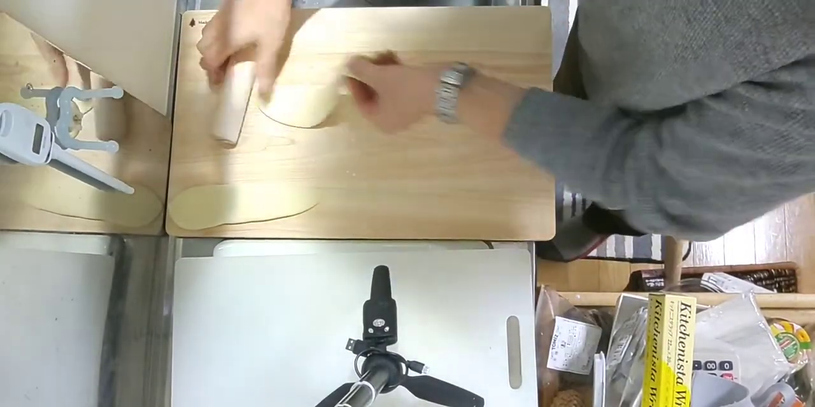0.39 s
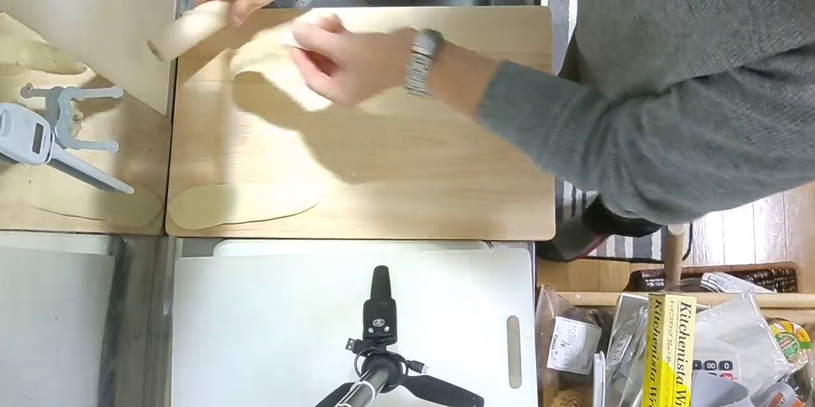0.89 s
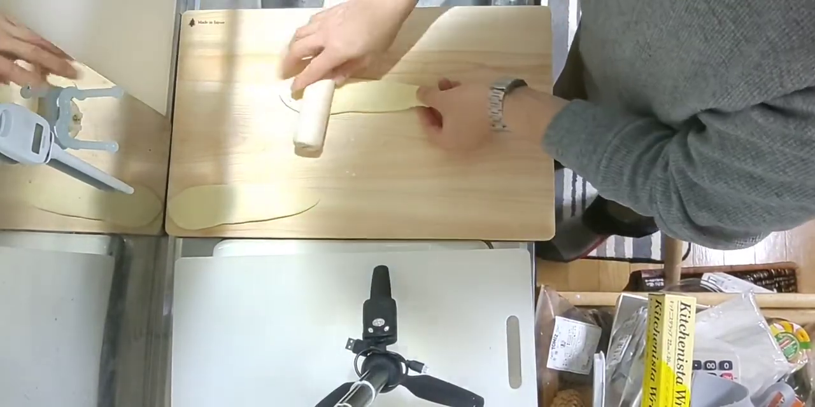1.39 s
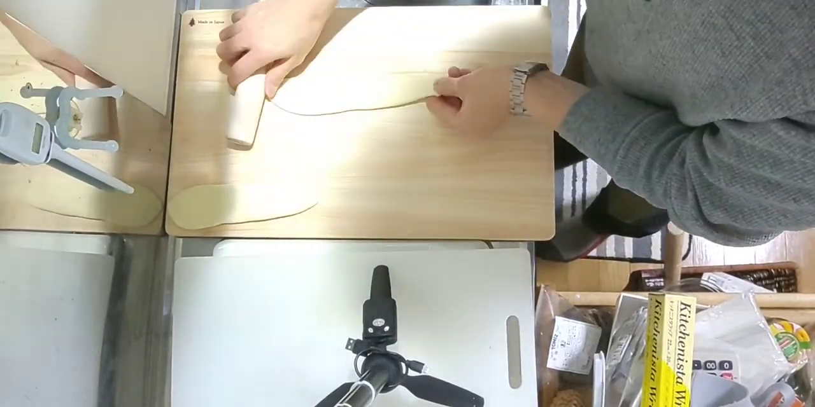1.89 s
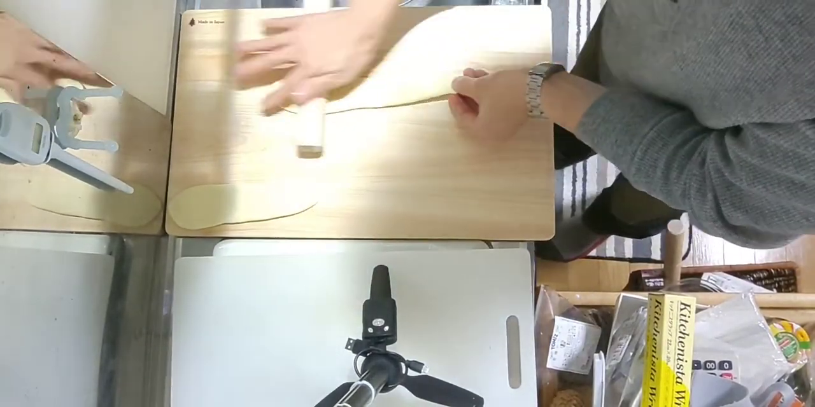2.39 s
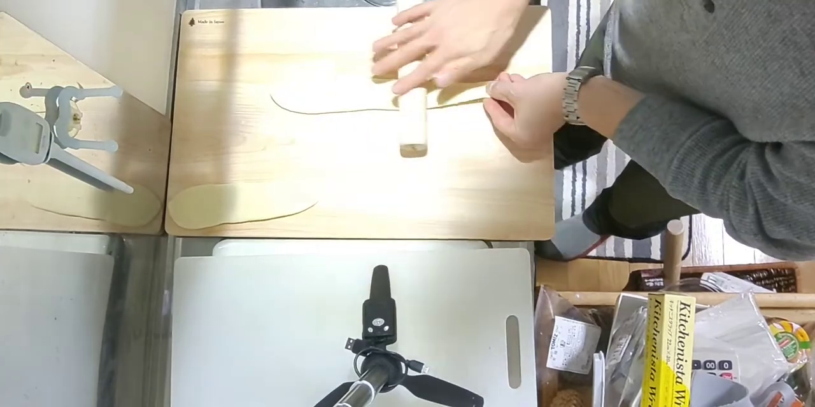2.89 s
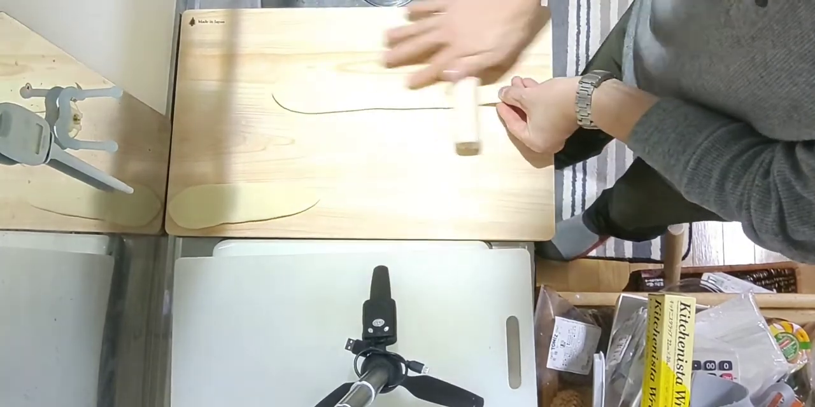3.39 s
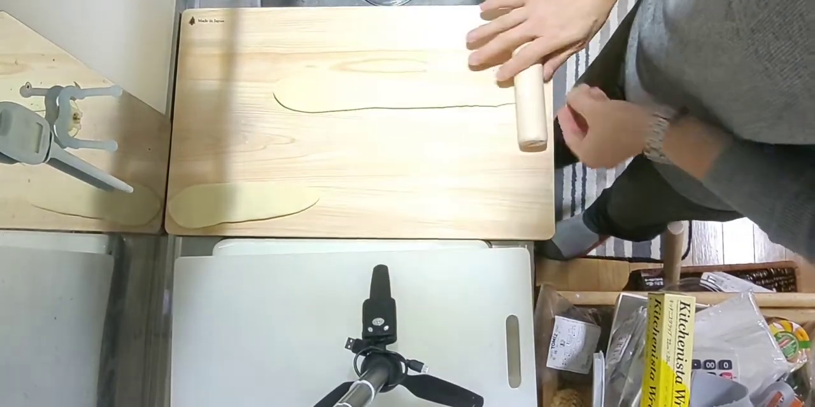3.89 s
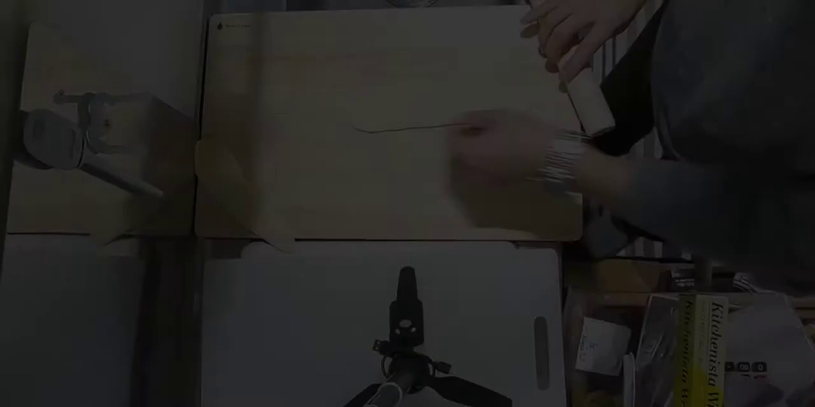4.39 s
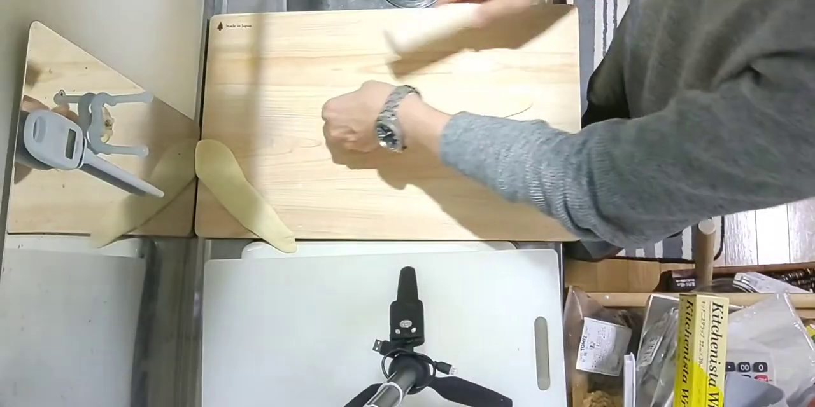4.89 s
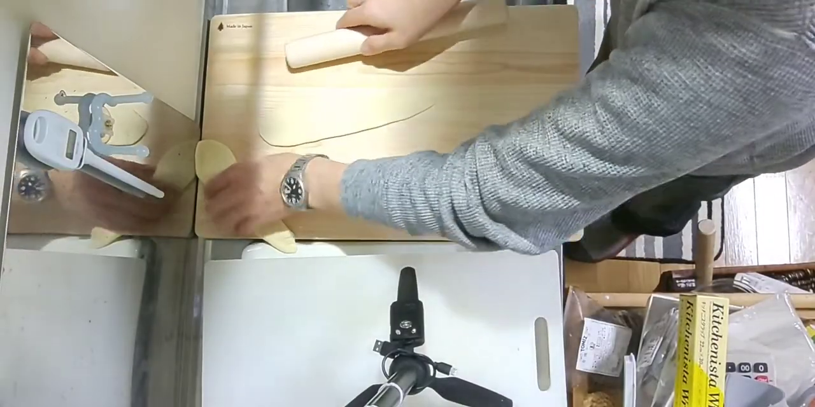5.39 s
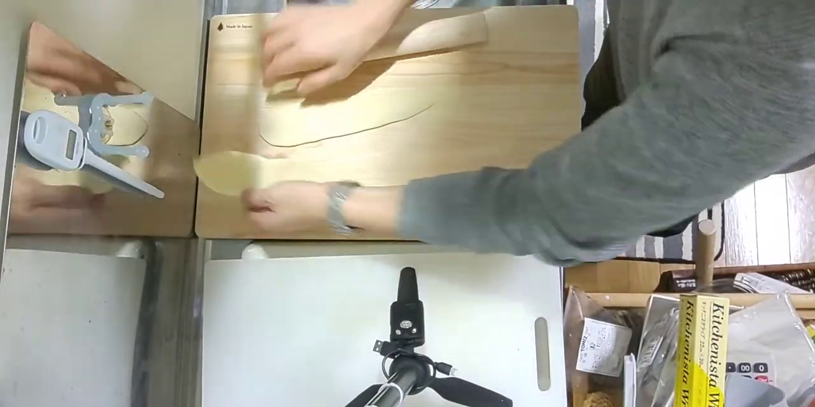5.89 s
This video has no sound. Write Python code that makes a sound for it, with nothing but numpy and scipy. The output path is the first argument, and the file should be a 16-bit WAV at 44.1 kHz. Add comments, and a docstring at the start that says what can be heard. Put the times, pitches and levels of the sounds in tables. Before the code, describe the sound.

Soft low rolling and dry hand scuffs on a wooden board, with hard wooden clacks and quick bouncing rattles in a small kitchen.

```python
"""Soft rolling and scuffing on a wooden board, broken by sharp knocks and quick bounces.
A short wooden pin rolls strips of dough in a small kitchen. Knocks ring the modes of the board; rolling
shakes the same modes softly with noise, and hands and pin scuff over flour as shaped hiss.
A spaced pair of microphones hears it with short echoes, over a faint room hush."""
import sys
import numpy as np
from scipy import signal
from scipy.io import wavfile

SR = 44100
rng = np.random.default_rng(int(sys.argv[2]) if len(sys.argv) > 2 else 0)


def log_audio(samples):
    """Write samples as a 16-bit WAV file to the path given in sys.argv[1]."""
    # one column per channel
    frames = np.atleast_2d(samples).T
    # limit to full scale, then quantise
    limited = np.clip(frames, -1, 1)
    pcm = np.round(limited * 32767).astype(np.int16)
    wavfile.write(sys.argv[1], SR, pcm)


def nominal_scale(level):
    """Amplitude ratio for a level in decibels (scalar or array-like)."""
    x = np.asarray(level, float) / 20
    return 10 ** x


N = 265041

# knocks on the board, relative levels per register: start_s, clack_db (near 900 Hz), boom_db (near 90 Hz),
# thud_db (near 190 Hz), snap_db (near 2 kHz), crack_db (above 3 kHz)
KNOCKS = [(.245, -49.5, -71, -34.5, -79, -72), (.325, -34, -68, -38.5, -65, -66),
          (.495, -57, -62, -53, -77, -77), (.58, -51.5, -55, -49.5, -53.5, -54),
          (1.081, -49.5, -80, -67, -54, -61), (1.244, -54.5, -69, -78, -70, -66),
          (1.457, -63, -42, -43.5, -75, -70), (1.468, -50, -63, -48, -56, -52),
          (1.483, -16.5, -35.5, -30.5, -27, -35.5), (1.521, -23, -37.5, -28, -46, -70),
          (1.903, -27, -52.5, -40, -59, -55.5), (2.241, -15.5, -38.5, -27, -38.5, -41.5),
          (2.252, -36, -36.5, -32.5, -38, -32.5), (2.266, -20, -37, -27.5, -35, -54),
          (2.905, -56, -62.5, -47, -71, -74), (3.127, -58, -52.5, -63.5, -70, -71.5),
          (4.152, -47.5, -64, -62, -66, -61), (4.685, -29, -48, -24, -38.5, -43),
          (4.702, -24.5, -66.5, -60, -49, -70), (4.732, -30, -53, -34, -39.5, -50),
          (4.771, -35.5, -62, -37, -51, -59), (4.806, -32.5, -65, -32.5, -53.5, -52),
          (4.819, -30.5, -59, -34.5, -54, -65), (4.84, -37.5, -94, -38, -72, -73),
          (5.324, -44.5, -75, -88, -56.5, -56.5), (5.51, -39, -47.5, -36, -45.5, -62),
          (5.544, -27.5, -52, -43, -51.5, -65), (5.565, -50, -63, -42, -62, -63),
          (5.602, -54, -52, -58, -78, -87), (5.685, -14, -43, -31, -21.5, -35.5),
          (5.689, -17.5, -61, -43, -30.5, -48.5), (5.695, -18.5, -55, -29.5, -35.5, -45)]
# hands and pin scuffing over flour, relative levels:
# strongest_s, swell_s, fade_s, body_db, airy_top_db (above 6 kHz)
SCUFF_STROKES = [(.105, 0.02, 0.1, -59, -60.5), (.22, 0.054, 0.072, -57.5, -61.5),
                 (.35, 0.038, 0.057, -55.5, -57.5), (.59, 0.064, 0.035, -55.5, -57.5),
                 (.74, 0.029, 0.042, -77, -80), (1.085, 0.0079, 0.025, -57.5, -59.5),
                 (1.17, 0.1, 0.017, -74, -63.5), (1.25, 0.018, 0.16, -73.5, -67),
                 (1.69, 0.078, 0.12, -55, -59), (2.015, 0.082, 0.042, -54, -57.5),
                 (2.5, 0.3, 0.19, -73.5, -70.5), (2.67, 0.014, 0.031, -64.5, -58.5),
                 (2.76, 0.022, 0.019, -71, -71), (2.98, 0.27, 0.092, -71.5, -71.5),
                 (3.13, 0.011, .04, -65, -70), (3.32, 0.11, .04, -65.5, -70),
                 (3.39, 0.0095, 0.017, -69.5, -64), (3.6, 0.14, 0.066, -70.5, -76),
                 (3.83, 0.067, 0.13, -62.5, -61.5), (4.09, 0.062, 0.09, -58.5, -63),
                 (4.46, 0.11, 0.041, -64, -72), (4.91, 0.079, 0.028, -64, -63),
                 (5.14, 0.058, 0.27, -65.5, -62), (5.27, 0.16, 0.08, -66.5, -60),
                 (5.49, 0.036, 0.16, -61.5, -61), (5.83, 0.2, 0.062, -68, -63),
                 (5.99, 0.078, .05, -72.5, -65.5)]
IDLE_SCUFF_DB = -85   # hands never rest fully


def rms_one(x):
    """Scale to rms 1."""
    return x / np.sqrt(np.mean(x ** 2) + 1e-20)


def at_hz(points, hz):
    """Read a spectrum on a log-frequency axis."""
    points_hz, points_db = np.transpose(points)
    return np.interp(np.log(hz), np.log(points_hz), points_db)


def drift(rate_hz):
    """Slow chance: noise twice through a one-pole low-pass; spread 1."""
    step = 40   # computed on every 40th sample, then interpolated
    r = np.exp(-2 * np.pi * rate_hz * step / SR)
    noise = rng.standard_normal(N // step + 2002)
    slow = signal.lfilter([1], [1, -2 * r, r * r], noise)[2000:]   # drop the filter's start-up
    return np.interp(np.arange(N) / step, np.arange(len(slow)), rms_one(slow))


def ring(drive, hz, t60_s):
    """A resonance: a unit click sets a decaying sine of starting height 1 ringing."""
    r = nominal_scale(-60 / (t60_s * SR))
    w = 2 * np.pi * hz / SR
    return signal.lfilter([0, np.sin(w)], [1, -2 * r * np.cos(w), r * r], drive + 1e-18)


def fade(clicks, t60_s):
    """A unit click becomes a level that dies away exponentially."""
    return signal.lfilter([1], [1, -nominal_scale(-60 / (t60_s * SR))], clicks + 1e-18)


def clicks_at(start_s, heights):
    """Single-sample clicks at the given times."""
    clicks = np.zeros(N)
    clicks[(np.array(start_s) * SR).astype(int)] = heights
    return clicks


def split_at_6k(noise, kind):
    """The part of a noise below ("low") or above ("high") 6 kHz."""
    return signal.sosfilt(signal.butter(4, 6000, kind, fs=SR, output="sos"), noise)


def strokes(rows, column, idle_db):
    """Level in dB of overlapping strokes that swell and fade, added as powers."""
    edge_db = 14   # a stroke is this much weaker one swell before and one fade after its top
    roundness = 1.54   # 1 pointed top, 2 rounded
    t = np.arange(0, N / SR + .002, .002)
    power = nominal_scale(2 * idle_db)
    for row in rows:
        strongest_s, swell_s, fade_s = row[:3]
        away = np.where(t < strongest_s, (strongest_s - t) / swell_s, (t - strongest_s) / fade_s)
        power = power + nominal_scale(2 * (row[column] - edge_db * away ** roundness))
    return np.interp(np.arange(N) / SR, t, 10 * np.log10(power))


def banded_noise(spectrum, patchy_db, grain_db):
    """Log-spaced bands of stereo noise, each with its own level, flicker and likeness; rms 1."""
    # likeness of left and right over pitch: pitch_hz, likeness (1 = same, 0 = unrelated)
    likeness = [(60, 0.95), (250, 0.56), (1000, 0.0058), (3000, 0.073), (10000, 0)]
    edges = np.geomspace(max(spectrum[0][0], 30), 15500, 15)
    white = rng.standard_normal((2, 2, N)) * nominal_scale(grain_db * drift(100))
    out = 0
    for k, (low, high) in enumerate(zip(edges, edges[1:])):
        band = signal.butter(2, [low, high], "band", fs=SR, output="sos")
        mid, side = signal.sosfilt(band, white[k % 2])
        hz = np.sqrt(low * high)
        alike = np.clip(at_hz(likeness, hz), -1, 1)
        gain = nominal_scale(at_hz(spectrum, hz) + patchy_db * drift(10.0))
        out = out + gain * (np.sqrt(1 + alike) * mid + np.sqrt(1 - alike) * side * [[1], [-1]])
    return rms_one(out)


def room_hush():
    """Faint steady room noise, heaviest in the bass."""
    # colour of the hush: pitch_hz, density_db (per Hz, relative)
    hush_spectrum = [(15, -43.5), (25, 4.5), (70, 1), (123, -7), (179, -8.5), (356, -14.5), (692, -17),
                     (977, -24), (1240, -21), (1850, -22.5), (3060, -25), (5350, -23), (8630, -34.5),
                     (13200, -30.5), (14300, -28)]
    return nominal_scale(-65) * banded_noise(hush_spectrum, patchy_db=1.76, grain_db=-0.8)


def kitchen(x):
    """Eight feedback delays a side, duller on every round, stepped block by block."""
    t60_s, wall_cut_hz = 0.32, 5700
    dull = np.exp(-2 * np.pi * wall_cut_hz / SR)
    x = signal.sosfilt(signal.butter(1, 250, "high", fs=SR, output="sos"), x)
    out = np.zeros((2, N))
    for k, lag in enumerate((np.geomspace(.009, .031, 16) * SR).astype(int)):
        loop, state = x.copy(), [0.]
        gain = nominal_scale(-60 * lag / SR / t60_s)
        for i in range(lag, N, lag):
            back, state = signal.lfilter([gain * (1 - dull)], [1, -dull], loop[i - lag:i], zi=state)
            loop[i:i + lag] += back[:N - i]
        out[k % 2] += (loop - x) * (-1) ** (k // 2)   # echoes only, alternating sides and signs
    return out


def scuffs(body_db):
    """Fine friction hiss; every stroke has its own level of body and of airy top."""
    # colour of the friction hiss: pitch_hz, density_db (per Hz, relative)
    scuff_spectrum = [(1350, -53.5), (2300, -19), (2600, -3.5), (3000, -8.5), (3240, -4.5), (3720, -4.5),
                      (3800, -6.5), (5200, -2), (7720, -10), (10000, -10), (14200, -16)]
    noise = banded_noise(scuff_spectrum, patchy_db=2.5, grain_db=2.0)
    top_db = strokes(SCUFF_STROKES, column=4, idle_db=IDLE_SCUFF_DB)
    body = nominal_scale(body_db) * split_at_6k(noise, "low")
    airy_top = nominal_scale(top_db) * split_at_6k(noise, "high")
    return nominal_scale(0.5) * (body + airy_top)


def cracks():
    """Each knock adds a noisy crack: a short puff with a softened onset and a longer, weaker rattle."""
    # colour of the crack: pitch_hz, density_db (per Hz, relative)
    crack_spectrum = [(1350, -22.5), (2300, -2), (3270, -3), (3740, -6), (5560, -7), (7100, -11.5),
                      (7900, -18), (10600, -15.5), (12700, -23.5), (14200, -39.5)]
    start_s, *_, snap_db, crack_db = np.transpose(KNOCKS)
    noise = banded_noise(crack_spectrum, patchy_db=1.0, grain_db=1.5)
    # blows that fall off steeply above the snap have a dull top
    top_db = crack_db + 1.65 * np.minimum(crack_db - snap_db, -1.5)
    out = 0
    for kind, level_db in (("low", crack_db), ("high", top_db)):
        clicks = clicks_at(start_s, nominal_scale(level_db))
        puff = nominal_scale(6.0) * fade(clicks, 0.044) - 2.1 * fade(clicks, 0.017)
        rattle = nominal_scale(-4.0) * fade(clicks, 0.17)
        out = out + (puff + rattle) * split_at_6k(noise, kind)
    return out


def rolling_level(hz, rumble_db, rub_db, scuff_db):
    """The weight of rolling moves the low modes, rubbing the middle ones, scuffing the high ones."""
    if hz < 290:
        return rumble_db - 11.5
    if hz < 650:
        return 0.45 * rumble_db + 0.56 * rub_db - 4.0
    if hz < 1300:
        return rub_db - 8.0
    return 0.5 * (rub_db + scuff_db) - 7.0


def board(rumble_db, rub_db, scuff_db):
    """Knocks and rolling friction shake the same modes; a knock takes a moment to swell in each mode."""
    # ringing modes of board and pin: pitch_hz, level_db (within its register), t60_s, left_over_right_db
    modes = [(61, -6, 0.6, 1.5), (87.8, 4.5, 0.37, -4), (123.6, -1.5, 0.26, 11.5), (158.7, 3, 0.18, -6),
             (185.6, 9, 0.081, -2), (241.5, -16.5, 0.16, 0), (266.9, -10.5, 0.17, 1.5),
             (321.4, -20.5, 0.31, 0), (367.4, -8.5, 0.14, 7), (460, -19, 0.18, -6), (527, -21.5, 0.28, 10),
             (606.4, -12.5, 0.11, 1.5), (689, -15, 0.041, -5.5), (759.4, -10.5, .1, -4),
             (784.8, -11.5, 0.087, 8), (846, -3.5, 0.029, 0.5), (879, -13, 0.059, -7),
             (921.6, -10.5, 0.045, -1), (966.3, -4, 0.038, 4.5), (1026.5, -9.5, 0.045, -3.5),
             (1076, -24, 0.11, 0.5), (1148, -17, 0.1, 12), (1376, -9.5, 0.066, -1), (1530, -10.5, 0.075, 1),
             (1653, -10, 0.077, -2.5), (1785, -9, 0.092, 1.5), (1884, -4, 0.092, -0.5),
             (2054, -8.5, 0.046, -0.5), (2259, -8, 0.055, -0.5), (2728, -5, 0.027, 4)]
    # centres of the boom, thud, clack and snap registers: pitch_hz
    register_hz = [115, 200, 900, 2000]
    # the pin chatters on the board after each knock; level relative to the knock
    chatter_db, chatter_t60_s, chatter_per_s = -18.5, 0.16, 470
    start_s, clack_db, boom_db, thud_db, snap_db, _ = np.transpose(KNOCKS)
    registers = np.transpose([boom_db, thud_db, clack_db, snap_db])
    spot = rng.standard_normal((len(start_s), len(modes)))   # each knock lands on another spot
    lumps = nominal_scale(3.7 * drift(11.0))   # dough and board are uneven under the pin
    chatter = (rng.random(N) < chatter_per_s / SR) * nominal_scale(chatter_db)
    out = np.zeros((2, N))
    for k, (hz, level_db, t60_s, pan_db) in enumerate(modes):
        blow_db = [np.interp(np.log(hz), np.log(register_hz), row) for row in registers]
        # the middle modes start in step and make one sharp clack; others start opposed
        sign = 1 if 500 < hz < 1300 else (-1) ** k
        clicks = clicks_at(start_s, nominal_scale(blow_db + 3.95 * spot[:, k]) * sign)
        clicks = clicks + chatter * rng.standard_normal(N) * fade(np.abs(clicks), chatter_t60_s)
        # taking away a faster-dying ring makes the knock swell over a cycle or two
        knock = ring(clicks, hz, t60_s) - ring(clicks, hz, min(6.33 / hz, .025))
        friction = ring(lumps * rng.standard_normal(N), hz, 0.49 * t60_s)
        rolling = nominal_scale(rolling_level(hz, rumble_db, rub_db, scuff_db)) * rms_one(friction)
        out += nominal_scale(level_db + pan_db * np.array([[.5], [-.5]])) * (knock + rolling)
    return out


def scene():
    """Board, cracks and scuffs, the echo of board and cracks in the kitchen, and the hush."""
    # pushes of the pin over dough and board, relative levels: strongest_s, swell_s, fade_s, rumble_db, rub_db
    pushes = [(.02, 0.12, 0.053, -50.5, -64), (.11, 0.044, 0.089, -57.5, -64),
              (.225, 0.19, 0.034, -57.5, -54.5), (.39, 0.15, 0.076, -51.5, -64.5),
              (.59, 0.16, 0.076, -52.5, -60.5), (.76, .06, 0.034, -68, -67),
              (1.1, 0.017, 0.065, -60.5, -60), (1.25, 0.038, 0.088, -66, -67),
              (1.66, 0.14, 0.078, -50.5, -56), (1.76, .06, 0.14, -52.5, -58),
              (1.97, 0.12, 0.036, -50.5, -77), (2.01, 0.048, 0.036, -54, -47),
              (2.45, 0.21, 0.058, -47, -72), (2.54, 0.08, 0.13, -50.5, -59.5),
              (2.66, 0.066, 0.08, -60.5, -82), (2.76, 0.022, 0.037, -58, -68.5),
              (2.91, 0.11, 0.1, -49, -57.5), (3.14, .03, 0.036, -57.5, -65.5),
              (3.25, 0.13, 0.07, -51.5, -59), (3.39, .03, .05, -63, -70.5), (3.53, 0.082, 0.12, -50.5, -63),
              (3.84, 0.13, 0.22, -62, -65), (4.1, 0.081, 0.079, -57, -52.5), (4.46, 0.17, 0.089, -65, -59),
              (4.9, .05, 0.085, -57.5, -56), (5.33, 0.18, .03, -78, -63.5), (5.47, 0.023, .12, -55.5, -65),
              (5.62, 0.067, 0.061, -48, -62), (5.82, 0.15, 0.069, -49, -55.5),
              (5.95, 0.013, 0.059, -65, -69.5)]
    rumble_db = strokes(pushes, column=3, idle_db=-72.5)
    rub_db = strokes(pushes, column=4, idle_db=-78.5)
    scuff_db = strokes(SCUFF_STROKES, column=3, idle_db=IDLE_SCUFF_DB)
    near = board(rumble_db, rub_db, scuff_db) + cracks()
    left_lag_s = 0.00012   # the left microphone is farther
    near[0] = np.interp(np.arange(N) - left_lag_s * SR, np.arange(N), near[0])
    echo = nominal_scale(-18) * kitchen(near.mean(axis=0))
    return near + echo + scuffs(scuff_db) + room_hush()


def roll_off(x):
    """The treble ends steeply here."""
    return signal.sosfilt(signal.butter(12, 14770, fs=SR, output="sos"), x)


def record(dry):
    """The microphones hiss and lose the deepest bass; the top is cut."""
    # thin self-noise: differencing neighbouring samples tilts it to the treble
    hiss = signal.lfilter([.6, -.6], [1], rng.standard_normal(dry.shape))
    mix = dry + nominal_scale(-67.5) * hiss
    mix = signal.sosfilt(signal.butter(5, 46, "high", fs=SR, output="sos"), mix)
    mix = signal.sosfilt(signal.cheby2(20, 60, 14650, fs=SR, output="sos"), mix)   # 60 dB down from 14650 Hz
    return roll_off(mix)


dry = scene()
out = record(dry)
log_audio(out)
```